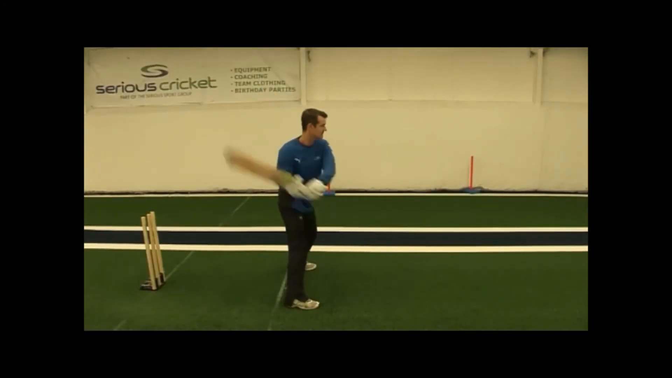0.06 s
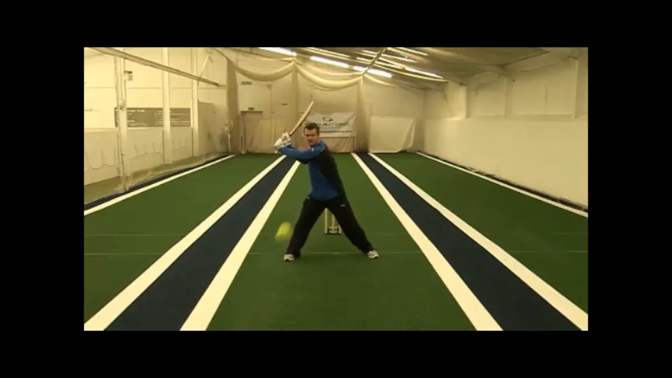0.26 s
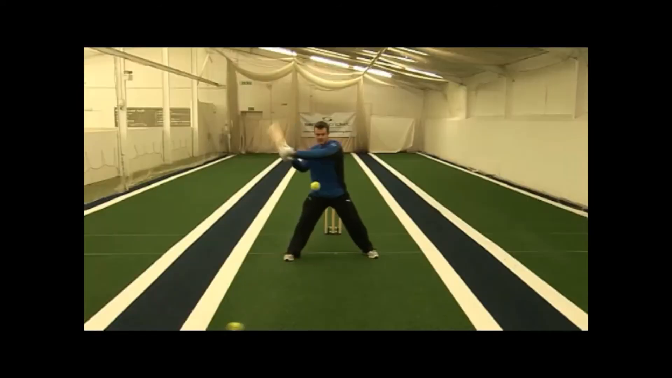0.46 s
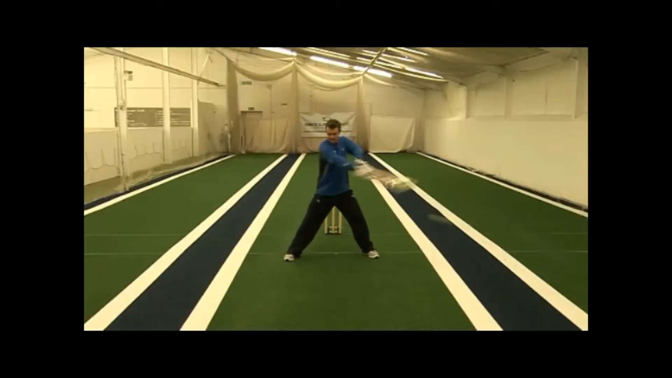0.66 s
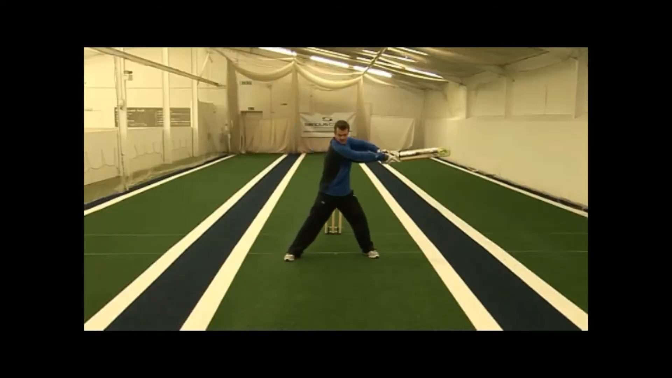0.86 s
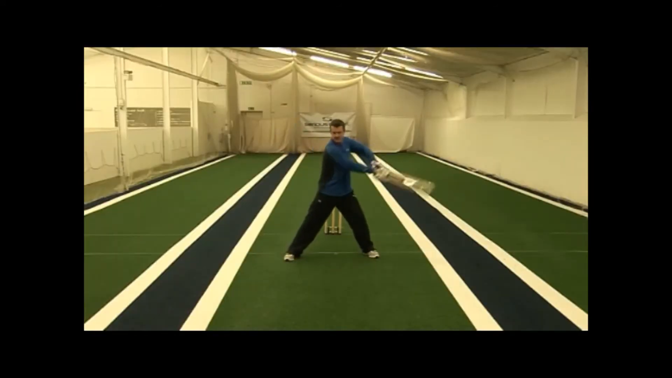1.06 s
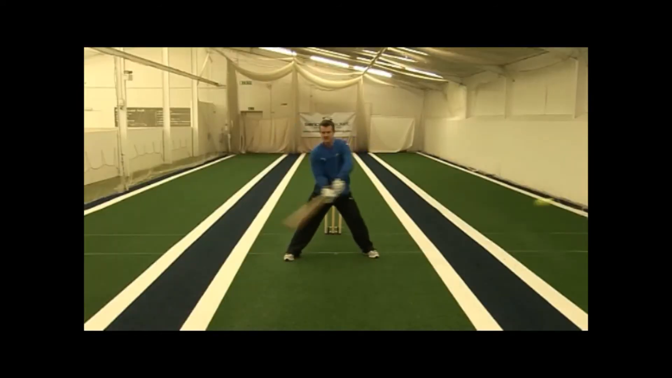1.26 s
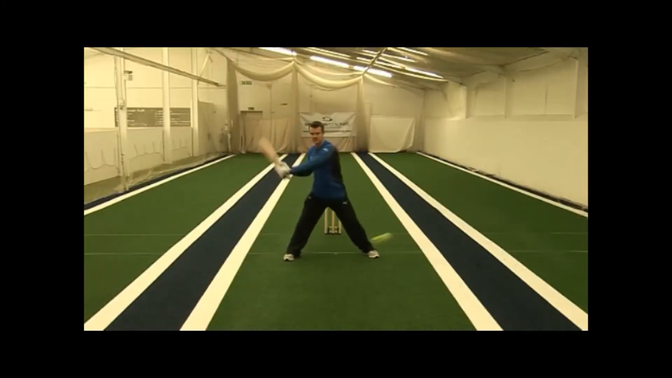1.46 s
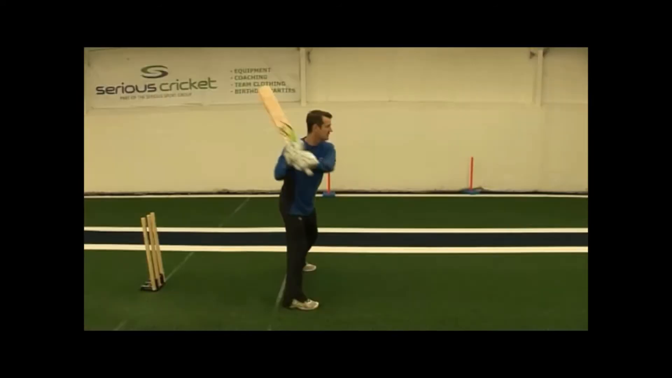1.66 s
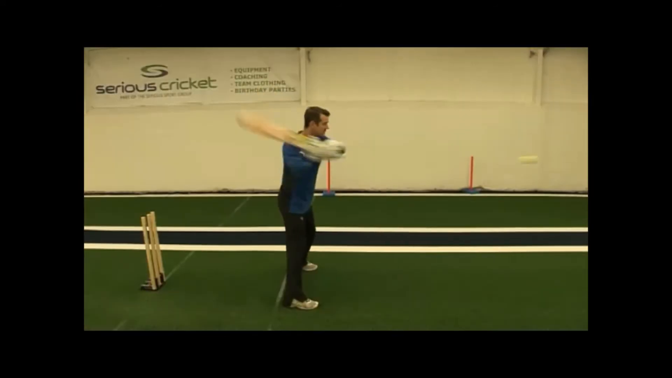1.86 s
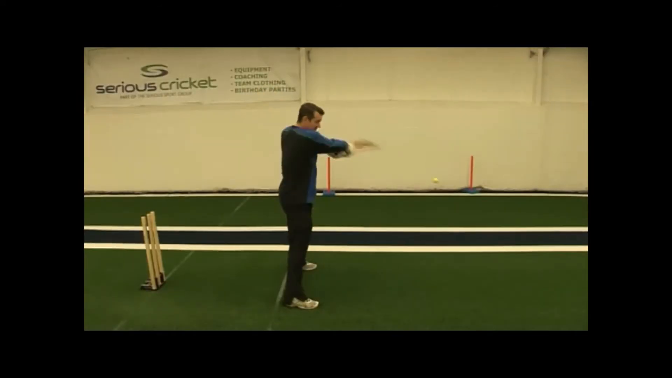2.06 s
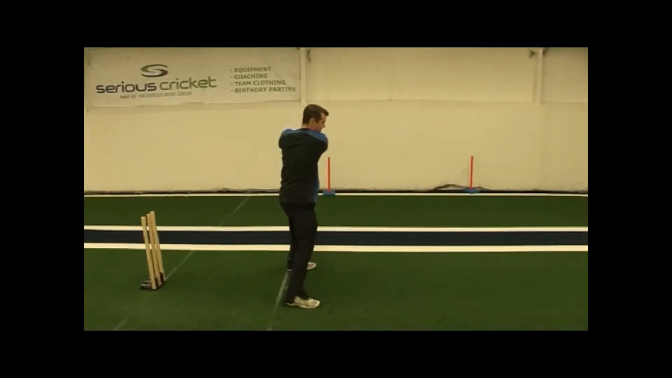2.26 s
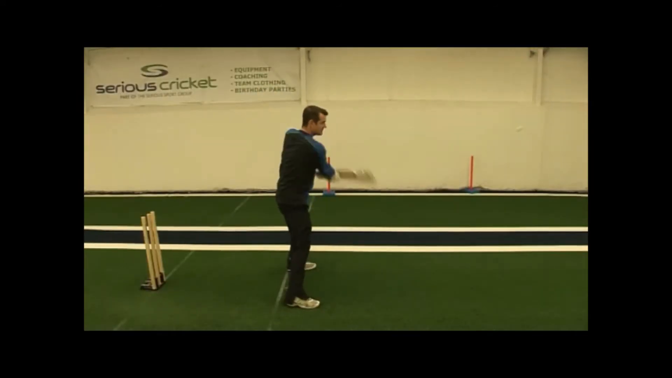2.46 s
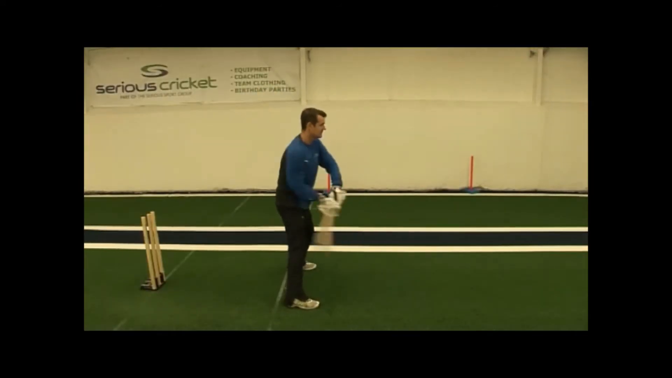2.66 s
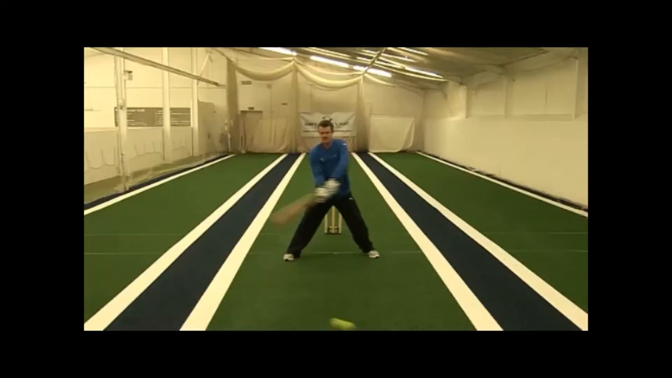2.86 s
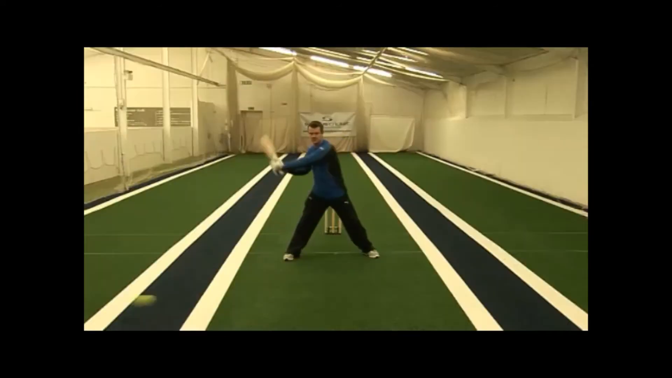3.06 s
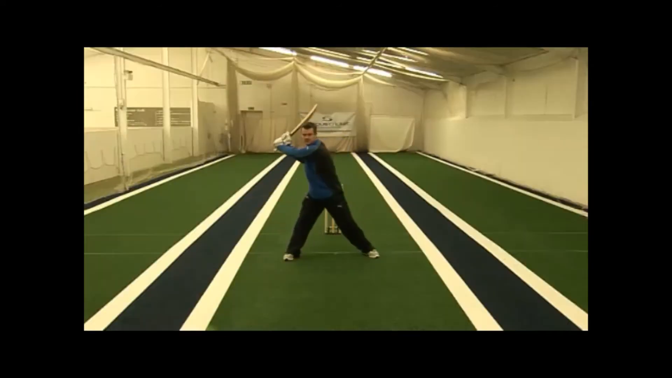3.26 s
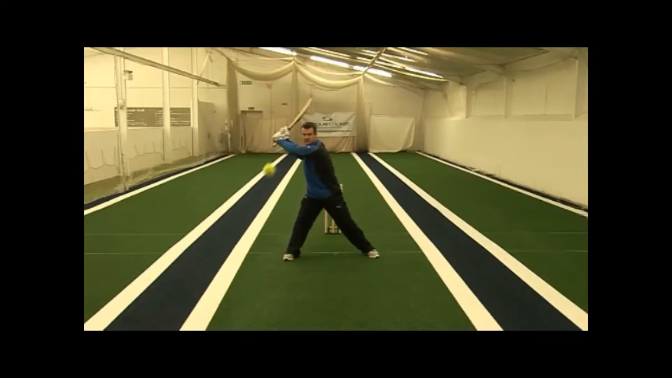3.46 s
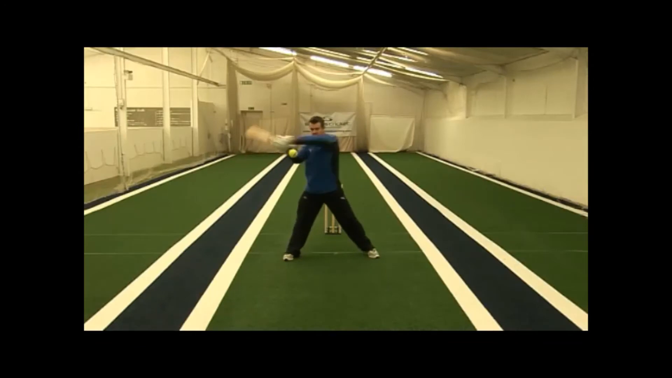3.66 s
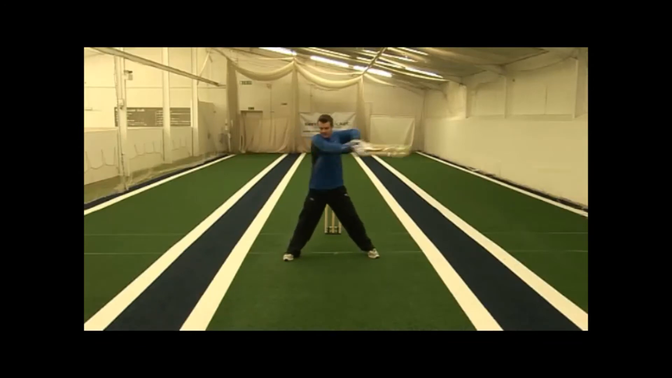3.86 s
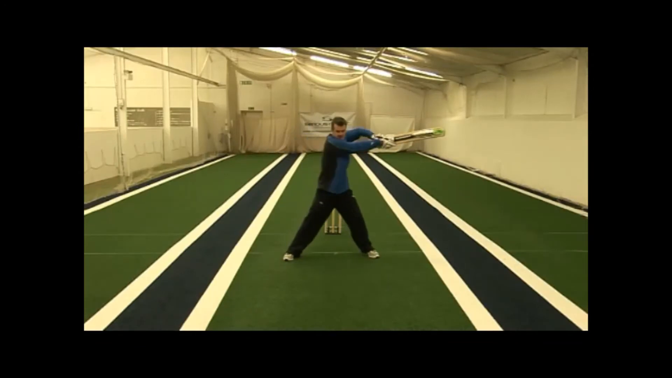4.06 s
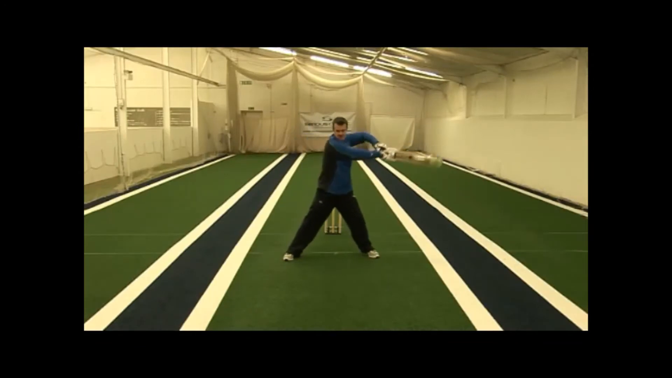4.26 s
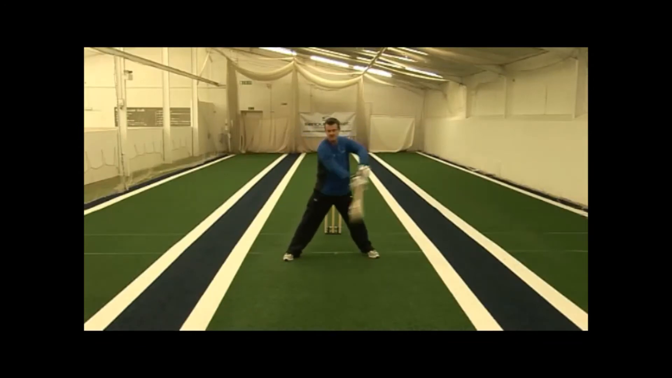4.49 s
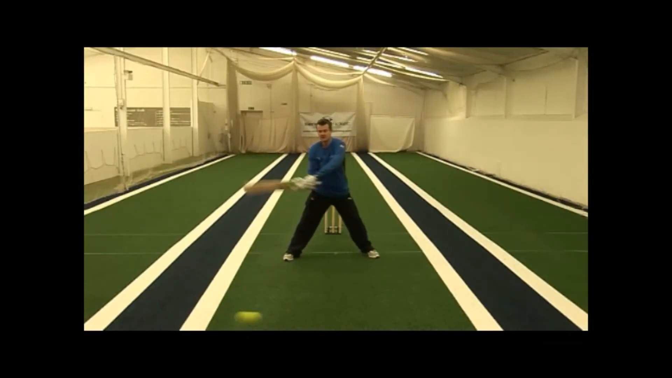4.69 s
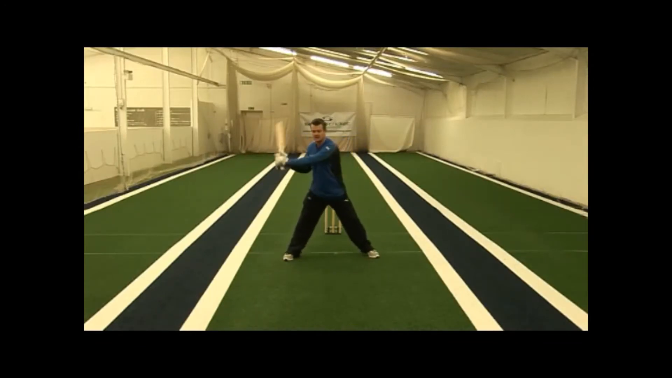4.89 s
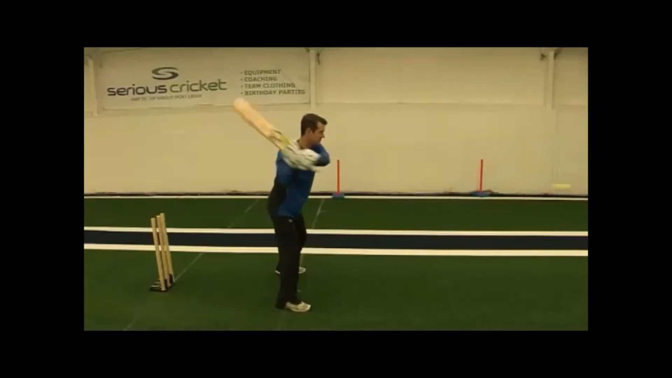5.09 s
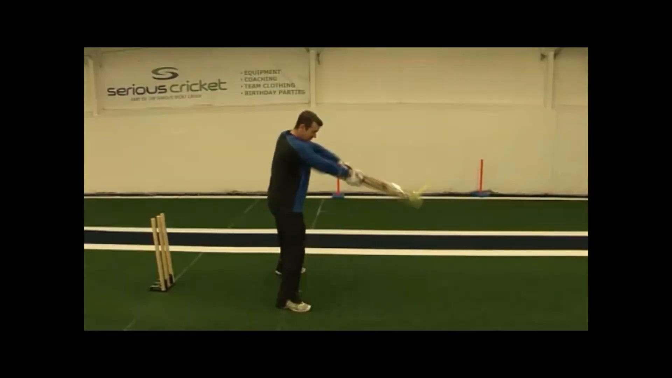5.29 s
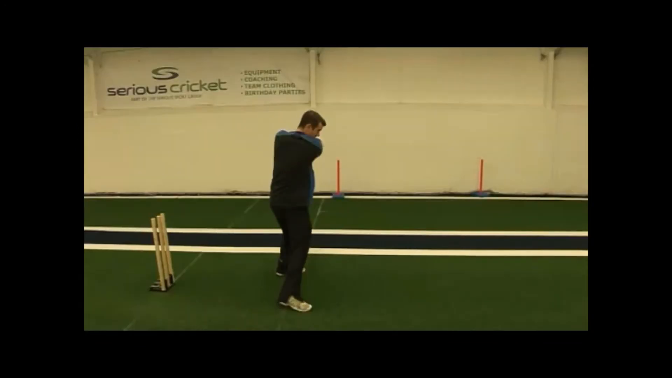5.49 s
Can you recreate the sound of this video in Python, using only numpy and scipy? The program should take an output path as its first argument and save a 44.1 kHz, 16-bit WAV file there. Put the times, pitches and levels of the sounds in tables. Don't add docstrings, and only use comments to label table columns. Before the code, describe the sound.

Batting practice in a long indoor hall with soft ventilation hum. A loud bat crack is followed by a ball knocking a panel that keeps ringing; three more cracks follow, with wall slaps, net clatter, board knocks and bounces. Scene cuts chop the reverberation. A dull clothing microphone sits left, a brighter, more distant camera microphone right.

```python
import sys
import numpy as np
from scipy import signal
from scipy.io import wavfile
from scipy.ndimage import uniform_filter1d, minimum_filter1d

SR = 44100
rng = np.random.default_rng(int(sys.argv[2]) if len(sys.argv) > 2 else 0)


def master_out(mix):
    frames = np.transpose(np.atleast_2d(mix))
    ceiling = np.clip(frames, -1, 1)
    pcm = np.round(ceiling * 32767).astype(np.int16)
    wavfile.write(sys.argv[1], SR, pcm)


def to_linear_factor(level_db):
    exponent = np.asarray(level_db, float) / 20
    return 10 ** exponent


N = 243866

CUTS = [1.6, 2.869, 4.953]
# (centre [Hz], camera level [dB], clothing level [dB])
AIR = [(60, -87.5, -68), (136.72, -66.5, -70), (250, -64, -70), (483.1, -59, -68), (1054.7, -66.5, -70.5),
       (2210, -73, -76), (3554, -77.5, -79), (8962, -76.5, -83.5)]
AIR_TAKE_DB = [-2, 0, -2.5, -4.5]
# (time [s], peak level [dB], time to fall 20 dB [s])
JOLTS = [(.56, -50, 0.1171), (.75, -45, 0.0391), (.92, -62, 0.2261), (1.29, -59, 0.5859),
         (1.72, -56, 0.0666), (1.87, -46, 0.0564), (1.97, -28.5, 0.0114), (2.085, -26, 0.049),
         (2.221, -36, -0.0491), (2.32, -44, -0.1328), (2.62, -50, -0.3324), (2.93, -62.5, -0.2222),
         (3.31, -64.5, 0.5647), (3.69, -40.5, -0.0054), (4.04, -36, 0.0195), (4.2, -54.5, 0.414),
         (4.71, -60, 0.285), (5.259, -40, 0.2536), (5.36, -45, 0.0029), (5.53, -54.5, 0.239)]
# (peak time [s], time to fall 20 dB [s], level [dB], left minus right [dB], low swish over it [dB])
RUSTLES = [(.05, 0.0224, -63.5, -10.5, -10.5), (.17, 0.29, -73.5, -1, -7), (.5, 0.1812, -71, -5.5, 2.5),
           (1.55, -1.5, -67.5, -5, -5.5), (1.809, 0.3868, -58.5, -10.5, -14.5),
           (2.201, 0.2054, -42, -13, -8), (3.15, 0.3964, -71, -2, -5), (3.26, -0.0402, -64.5, 2.5, -4.5),
           (3.7, 0.2716, -71, -4.5, -11), (4.85, .1, -56, 1.5, 4), (4.92, -0.1474, -61, 3, 8),
           (5.06, .07, -68, -7, -4.5), (5.11, 0.136, -64, -2.5, -4.5), (5.18, 0.0619, -59.5, -3, 1)]
# (contact time [s], level [dB], left minus right [dB], low swish over it [dB])
SWINGS = [(0.631, -57.5, -7.5, -0.5), (2.005, -41.5, 4.5, -1.5), (3.789, -50.5, 0.5, -1),
          (5.267, -51.5, -4.5, 2.5)]
# (time [s], camera level [dB], clothing level [dB], pitch [Hz], t60 [s])
THUDS = [(0.918, -47, -29, 45.11, 0.0413), (1.96, -58, -30.5, 50.46, 0.1251),
         (2.06, -50, -25, 140.3, 0.05013), (2.076, -42.5, -20, 62.26, 0.06855),
         (2.31, -58, -39, 110.2, .06), (3.67, -58, -42, 51.56, 0.14617), (5.239, -37, -65, 191.1, 0.1132),
         (5.283, -39.5, -30, 49.95, 0.0757)]
# (time [s], centre [Hz], width [Hz], camera level [dB], t60 [s])
SHEET = [(0.924, 1080, 60, -38, 1.2685), (0.926, 1320, 111.2, -40.5, 1.3407),
         (0.926, 1626, 250, -44.5, 1.449), (2.87, 1171, 123.5, -50.5, 1.0975)]

# (time at camera [s], camera level [dB], clothing level [dB], crack level [dB], hall level [dB])
BAT_FRONT = [(.6453, -2, -13.5, -4.5, -25), (3.8047, -0.5, -10.5, -1.5, -23.5)]
BAT_SIDE = [(2.0137, 0.00012, -5.5, -2.5, -23.5), (5.2762, 0.00194, -8.5, -1.5, -22)]
WALL_ECHO = [(.6609, -10, -26.5, -7, -43.5), (3.8169, -17.5, -26, -4.5, -44.5), (2.042, -1, -23, 4.5, -36),
             (5.3046, -1, -23.5, 7, -34.5)]
PANEL = [(.9212, -4, -17.5, -18, -36)]
BOARD = [(4.0375, -.5, -11, -14, -26), (5.4957, -1, -12, -5, -28)]
BEFORE_CHANGE = [(-.2, -60, -70, -10, -43), (2.8, -60, -69.5, -14.5, -40.5)]
NET = [(2.234, -11, -12.5, 3, -38), (2.241, -11.5, -29, -3, -41), (2.249, -17, -16.5, 8.5, -35),
       (2.257, -13, -34.5, 25, -50.5), (4.105, -25, -26.5, -2, -69), (4.174, -25.5, -48, -6, -43.5),
       (4.189, -34, -28.5, -41, -61), (4.25, -28, -30, -39, -53.5), (4.296, -29, -34.5, -36.5, -60.5),
       (.8445, -14.5, -39.5, -25.5, -51.5)]
BOUNCE = [(.266, -19, -49.5, -10, -51.5), (4.4279, -13.5, -22.5, -14, -47.5)]
TAP = [(1.943, -41.5, -46.5, 2.5, -65.5), (3.4372, -34, -54.5, -16, -63.5)]

# (pitch [Hz], level [dB], t60 [s])
WILLOW_FRONT = [(309.77, 2.5, 0.02373), (588.48, 0.5, 0.015743), (818.05, -0.5, 0.03628),
                (1216.6, 1, 0.016776), (1808.3, -2.5, 0.01502), (2901.7, -4, 0.0073)]
WILLOW_SIDE = [(322.77, -1.5, 0.023), (705.67, 3, 0.028), (968.17, -3, 0.015), (1769.2, 0.5, 0.01),
               (2481.7, -3.5, 0.0078), (3816.3, -0.5, .008)]
PANEL_MODES = [(276.03, 3.5, 0.0373), (564.36, -2, 0.01902), (1098.2, -9.5, 0.0652), (1320, 5, 0.02938),
               (2112, -11.5, 0.0125)]
BOARD_MODES = [(250, -18, 0.046), (422.09, 3, 0.0198), (677.06, 2.5, 0.0534), (913.2, 4, 0.03),
               (1495.1, 2.5, 0.01097), (2348.1, 6, 0.006368)]
NET_MODES = [(319.21, 5, 0.04025), (541.37, -8, 0.03887), (912.33, -3.5, 0.02223), (1832.6, -10.5, 0.02408)]
TURF_MODES = [(453.53, -3, 0.01687), (774.66, -3, 0.01787), (1351.7, 5.5, 0.00856),
              (3435.4, -12.5, 0.01522)]
TAP_MODES = [(499.4, -20.5, 0.01212), (1259.4, 5, 0.0185), (1730.7, -1.5, 0.01727), (3228, -15, 0.00737)]
# (blows, modes, lead with camera in front [ms], lead with camera at the side [ms])
KINDS = [
    (BAT_FRONT, WILLOW_FRONT, 14.4, 14.4),
    (BAT_SIDE, WILLOW_SIDE, 8.1, 8.1),
    (WALL_ECHO, WILLOW_SIDE, 1.5, .8),
    (PANEL, PANEL_MODES, 6.8, 6.8),
    (BOARD, BOARD_MODES, 3.6, 9.8),
    (NET, NET_MODES, .1, 2.5),
    (BOUNCE, TURF_MODES, 1.1964, 1.2),
    (TAP, TAP_MODES, -3.5, 1.5),
    (BEFORE_CHANGE, BOARD_MODES, 2.9168, 2.9959),
]
# (build-up [s], early level [dB], early t60 [s], tilt [dB per octave])
ANSWERS = [(0.014357, 1, 0.1554, 1.1047), (0.0411, 8, 0.1184, 2), (0.0022, 23, 0.04163, 3.5),
           (0.00446, 22, 0.04917, -3.5), (0.00579, 13.5, 0.06521, -2.5), (0.001826, 10.5, 0.12149, -.5),
           (0.01364, 14, 0.1564, -1.5), (.011, 13.5, 0.13806, -2.5), (.006, -2.5, 0.1954, -1.0852)]
# (delay [s], level [dB])
ROOF = [(0.011, -7), (.013, -14.5), (0.0036, -8), (0.0083, -18.5), (0.017, -18.5), (.005, -15.5),
        (.0115, -9), (0.01, -9.5), (.01, -9)]
# (centre [Hz], t60 [s], camera level [dB], clothing level [dB])
HALL = [(130.13, 0.4, -27, -21.5), (250, 1.1277, -7.5, -16), (474.71, 1.3716, -4, -13.5),
        (974.1, 1.1983, -4.5, -16), (2097.2, 1.4038, -9.5, -20), (3842.8, 1.36, -12, -28.5),
        (7620, 0.7877, -27, -35)]

JOLT_RISE, JOLT_FLOOR_DB = 0.9448, -70
WHIP_DB_PER_S, LIFT_DB, LIFT_DB_PER_S = 454, -20.5, 150
MODE_SCATTER_DB = 2
CRACK_S, HISS_S = 0.0009379, 0.0012
TURF_ECHO_S, TURF_ECHO_DB = 0.0019096, -6.5
CLOTH_CUT_HZ = 3086
TAIL = int(1.9 * SR)
LEAK_TO_RIGHT, LEAK_TO_LEFT = 0.24444, 0.18179


def band(x, lo_hz, hi_hz):
    sos = signal.butter(2, [lo_hz, min(hi_hz, .45 * SR)], "bandpass", fs=SR, output="sos")
    y = signal.sosfilt(sos, x)
    return y / np.sqrt(np.mean(y ** 2, axis=-1, keepdims=True))


def walk(rate):
    hold = int(SR / rate)
    steps = np.repeat(rng.standard_normal(N // hold + 1), hold)
    return 0.7502 * uniform_filter1d(uniform_filter1d(steps, hold), hold)[:N]


def fade(t, t60):
    return np.exp(-np.log(1000) * t / abs(t60))


def swell(t, s, rise_s, fall_s):
    same_take = np.searchsorted(CUTS, t) == np.searchsorted(CUTS, s)
    return same_take * to_linear_factor(-20 * np.maximum((s - t) / rise_s, (t - s) / fall_s))


def per_mic(cloth_db, cam_db):
    return np.array([[cloth_db], [cam_db]])


def add(out, x, at, since):
    edges = np.r_[0, np.array(CUTS) * SR, N].astype(int)
    take = np.searchsorted(CUTS, since)
    i = int(round(at * SR))
    first = max(i, edges[take])
    last = max(first, min(i + len(x), edges[take + 1]))
    out[first:last] += x[first - i:last - i]


def air():
    t, common = np.arange(N) / SR, walk(0.57755)
    out = np.zeros((2, N))
    for hz, cam_db, cloth_db in AIR:
        noise = band(rng.standard_normal((2, N)), hz / 2 ** .5, hz * 2 ** .5)
        drift_db = 3.4474 * common + 3.1645 * walk(4.6281)
        out += noise * to_linear_factor(per_mic(cloth_db, cam_db)) * to_linear_factor(drift_db)
    return out * to_linear_factor(np.array(AIR_TAKE_DB)[np.searchsorted(CUTS, t)])


def clothing():
    t = np.arange(N) / SR
    out = np.zeros((2, N))
    jolts = to_linear_factor(JOLT_FLOOR_DB)
    for s, db, fall_s in JOLTS:
        jolts = jolts + to_linear_factor(db) * swell(t, s, JOLT_RISE * fall_s, fall_s)
    out[0] = jolts * to_linear_factor(-2.0) * band(rng.standard_normal(N), 28, 71.787)

    grain = to_linear_factor(3.2 * walk(40))
    high = band(rng.standard_normal((2, N)), 1500, 6707.3)
    low = band(rng.standard_normal((2, N)), 600, 1933)
    moves = [(swell(t, s, fall_s, fall_s), *how) for s, fall_s, *how in RUSTLES]
    for s, *how in SWINGS:
        whip = swell(t, s, 20 / WHIP_DB_PER_S, 0.0024)
        lift = to_linear_factor(LIFT_DB) * swell(t, s, 20 / LIFT_DB_PER_S, .002)
        moves.append((whip + lift, *how))
    for shape, db, pan_db, low_db in moves:
        swish = high + to_linear_factor(low_db) * low
        out += shape * grain * swish * to_linear_factor(db + per_mic(pan_db, -pan_db) / 2)
    return out


def thuds():
    out, t = np.zeros((2, N)), np.arange(SR // 3) / SR
    for s, cam_db, cloth_db, hz, t60 in THUDS:
        bump = np.sin(2 * np.pi * hz * t) * np.minimum(t * hz, 1) * fade(t, t60) * 3
        add(out[0], to_linear_factor(cloth_db) * bump, s, s)
        add(out[1], to_linear_factor(cam_db) * bump, s, s)
    return out


def sheet():
    out, t = np.zeros((2, N)), np.arange(TAIL) / SR
    for s, hz, width_hz, db, t60 in SHEET:
        ring = band(rng.standard_normal((2, TAIL)), hz - width_hz / 2, hz + width_hz / 2) * fade(t, t60)
        add(out[0], to_linear_factor(db - 9) * ring[0], s, s)
        add(out[1], to_linear_factor(db) * ring[1], s, s)
    return out


def hall(echoes, lumps, build_s, early_db, early_t60, tilt_db):
    t = np.arange(TAIL) / SR
    shape = (1 - np.exp(-t / build_s)) * (1 + to_linear_factor(early_db) * fade(t, early_t60) * lumps)
    tail = 0
    for (hz, t60, cam_db, cloth_db), echo in zip(HALL, echoes):
        level_db = per_mic(cloth_db, cam_db) + tilt_db * np.log2(hz / 1000)
        tail = tail + to_linear_factor(level_db) * fade(t, t60) * echo
    return shape * tail


def blow(modes, crack_db, chance, noise, swell_s):
    t = np.arange(len(noise)) / SR
    ring = np.zeros(len(t))
    for k, ((hz, db, t60), c) in enumerate(zip(modes, chance)):
        level = (-1) ** k * to_linear_factor(db + MODE_SCATTER_DB * c)
        tone = np.sin(2 * np.pi * hz * (1 + 0.05558 * c) * t)
        ring += level * fade(t, t60 * (1 + 90 * swell_s)) * tone
    ring *= 1 - np.exp(-t / swell_s)
    click = np.diff(np.exp(-((t - .0002) / .000065) ** 2), prepend=0)
    spray = 0.6148 * noise * (np.exp(-t / CRACK_S) + 0.14 * np.exp(-t / HISS_S))
    crack = click / click.max() + spray
    y = ring / abs(ring).max() + to_linear_factor(crack_db) * crack
    lag = int(TURF_ECHO_S * SR)
    y[lag:] += to_linear_factor(TURF_ECHO_DB) * y[:-lag]
    return y / abs(y).max()


def knocks():
    out = np.zeros((2, N))
    dull = signal.butter(2, CLOTH_CUT_HZ, fs=SR, output="sos")
    spray = band(rng.standard_normal(N), 1000, 6908.4)
    dense = []
    for hz, *_ in HALL:
        noise = band(rng.standard_normal((2, 2 * TAIL)), hz / 2 ** .5, hz * 2 ** .5)
        dense.append(noise * to_linear_factor(3.2497 * walk(39.693)[:2 * TAIL]))
    dense = np.array(dense)
    lumps = to_linear_factor(4.399 * walk(250))
    for (rows, modes, *leads_ms), answer, (roof_s, roof_db) in zip(KINDS, ANSWERS, ROOF):
        chance = rng.random((16, 14))
        for c, (s, cam_db, cloth_db, crack_db, hall_db) in zip(chance, rows):
            lead_ms = leads_ms[np.searchsorted(CUTS, s) % len(leads_ms)]
            a, b = (c[:2] * TAIL).astype(int)
            far = blow(modes, crack_db, 2 * c[2:8] - 1, spray[a:a + 4096], 0.0003403)
            near = blow(modes, crack_db - 1.5, 3 * c[8:] - 1.5, spray[b:b + 4096], 0.004593)
            near = signal.sosfilt(dull, near)
            tail = to_linear_factor(hall_db) * hall(dense[..., a:a + TAIL], lumps[b:b + TAIL], *answer)
            heard = s + .25 if cam_db < -50 else s + .001
            for mic, x, at, db in (0, near, s - lead_ms / 1000, cloth_db), (1, far, s, cam_db):
                add(out[mic], to_linear_factor(db) * x, at, heard)
                add(out[mic], to_linear_factor(db + roof_db) * signal.sosfilt(dull, x), at + roof_s, heard)
                add(out[mic], tail[mic], at, heard)
    return signal.sosfilt(signal.butter(2, 120, "highpass", fs=SR, output="sos"), out)


def scene():
    return air() + clothing() + thuds() + sheet() + knocks()


def thin(x, from_hz, share, left_db, jump_db):
    hz, _, z = signal.stft(x, SR, nperseg=1024)
    strip = uniform_filter1d(uniform_filter1d(abs(z), size=4, axis=1), size=3, axis=2)
    around = uniform_filter1d(strip, size=17, axis=1)
    treble = abs(z[:, hz > from_hz]).mean(axis=(0, 1))
    steady = treble < to_linear_factor(jump_db) * minimum_filter1d(treble, size=5)
    weak = (strip < share * around) & (hz[:, None] > from_hz) & steady
    return signal.istft(np.where(weak, to_linear_factor(left_db) * z, z), SR, nperseg=1024)[1][:, :N]


def low_pass(x):
    return signal.sosfilt(signal.butter(12, 12830, fs=SR, output="sos"), x)


def record(dry):
    x = np.array([[1, LEAK_TO_LEFT], [LEAK_TO_RIGHT, 1]]) @ dry
    x = np.tanh(0.9204 * x) / 0.79878
    x = signal.sosfilt(signal.butter(2, 38, "highpass", fs=SR, output="sos"), x)
    x = signal.sosfilt(signal.cheby2(8, 26, 12300, fs=SR, output="sos"), x)
    x = thin(x, from_hz=2200, share=.94, left_db=-20, jump_db=7)
    return low_pass(x)


dry = scene()
out = record(dry)
master_out(out)
```